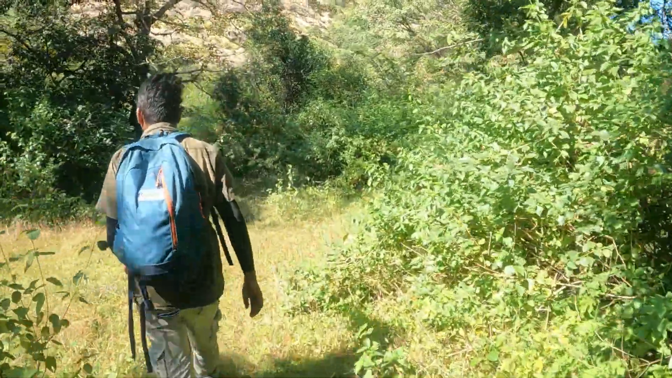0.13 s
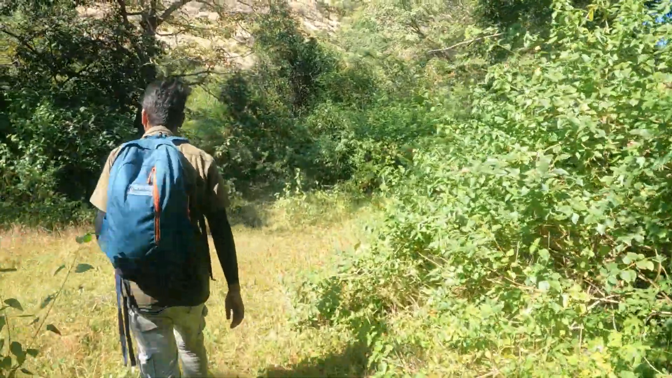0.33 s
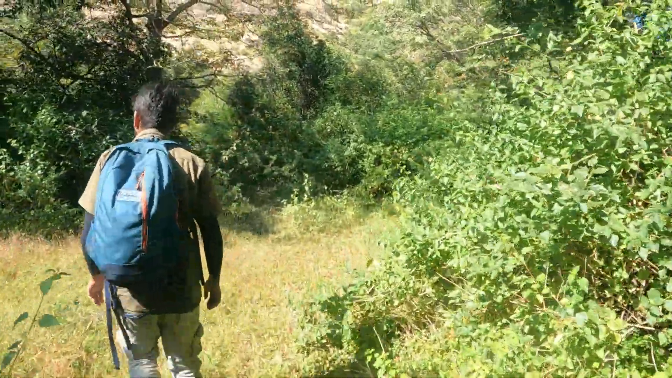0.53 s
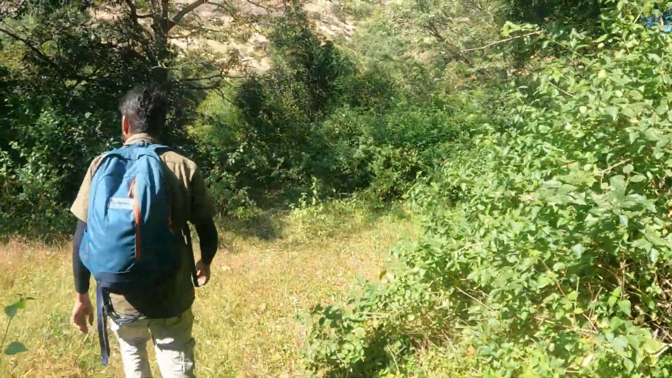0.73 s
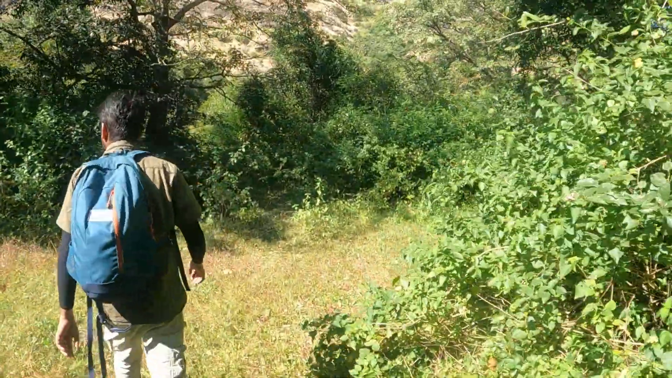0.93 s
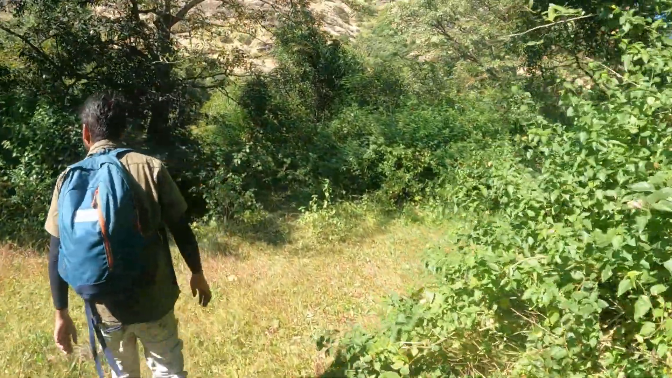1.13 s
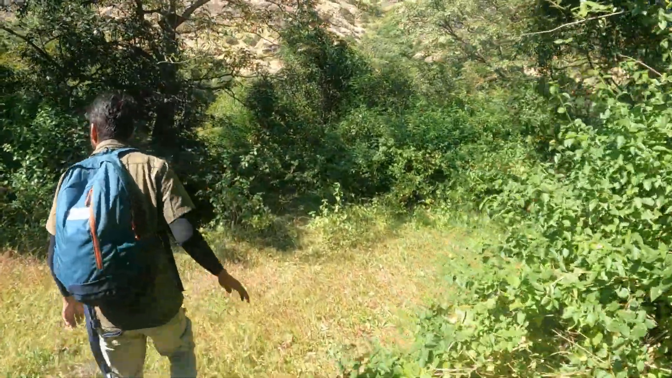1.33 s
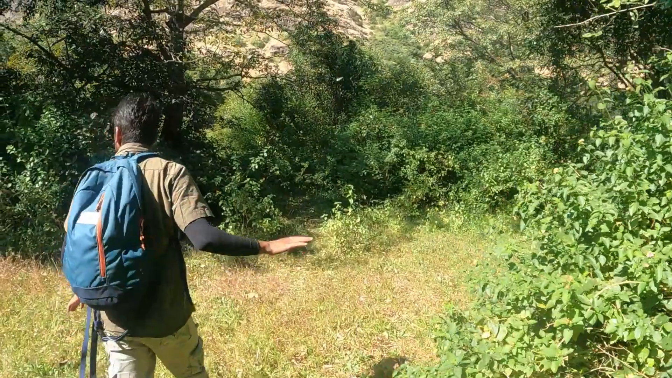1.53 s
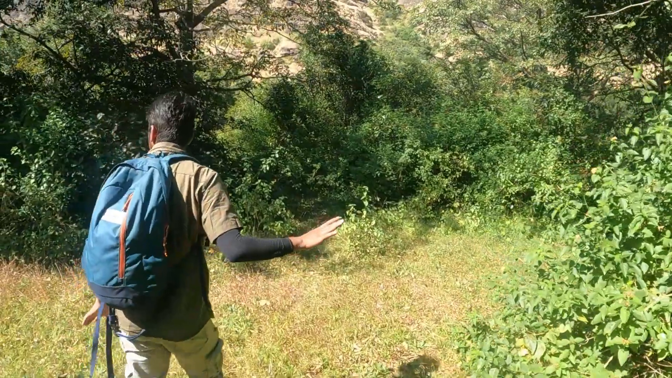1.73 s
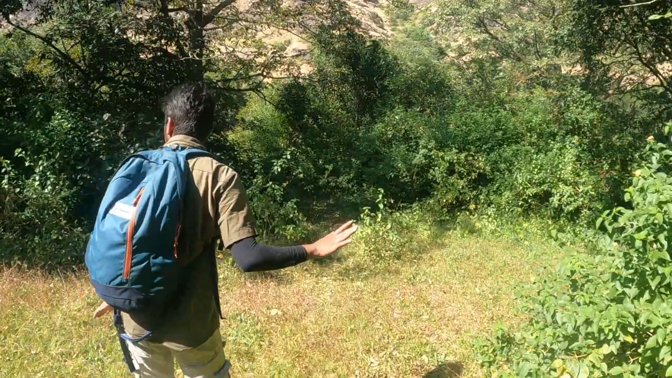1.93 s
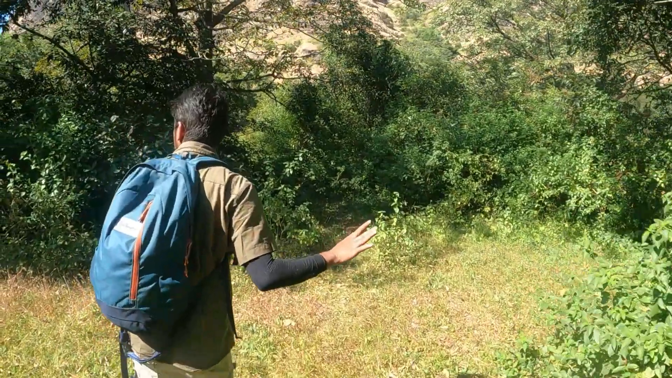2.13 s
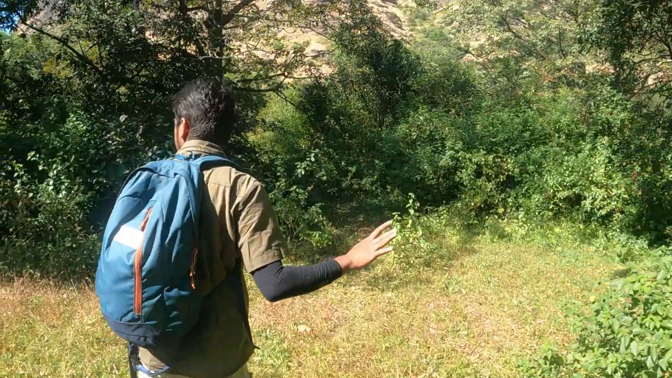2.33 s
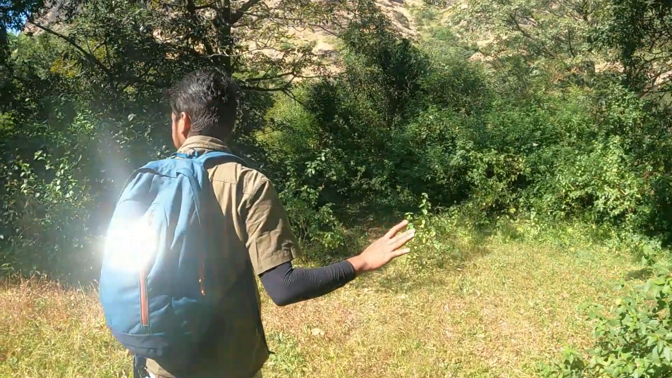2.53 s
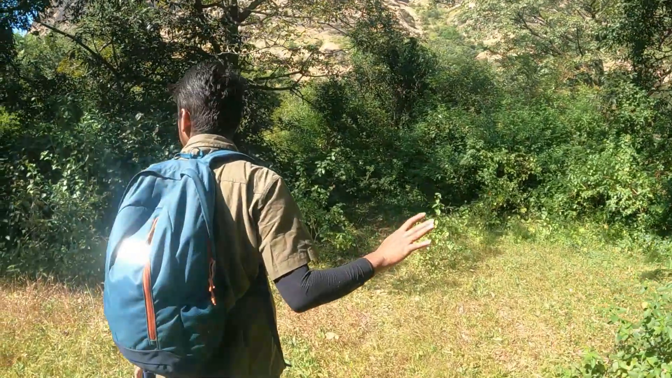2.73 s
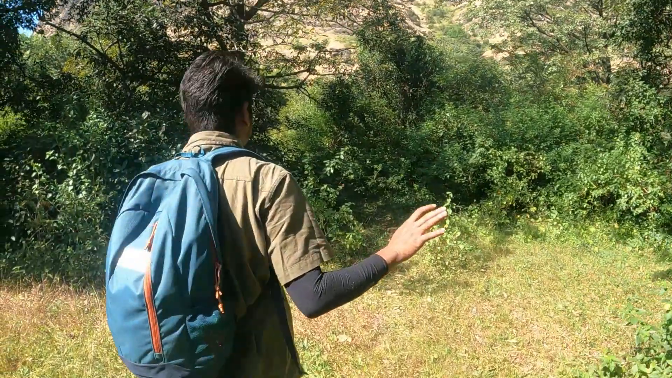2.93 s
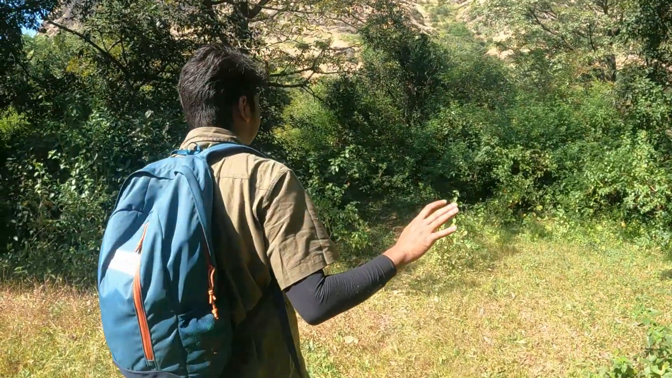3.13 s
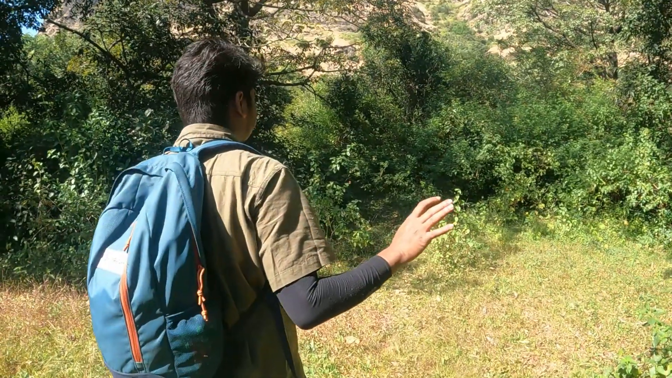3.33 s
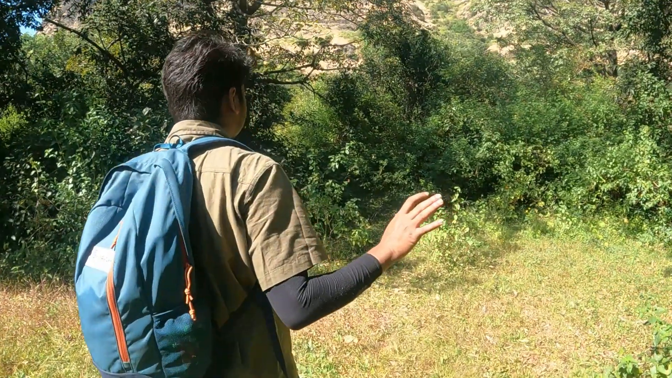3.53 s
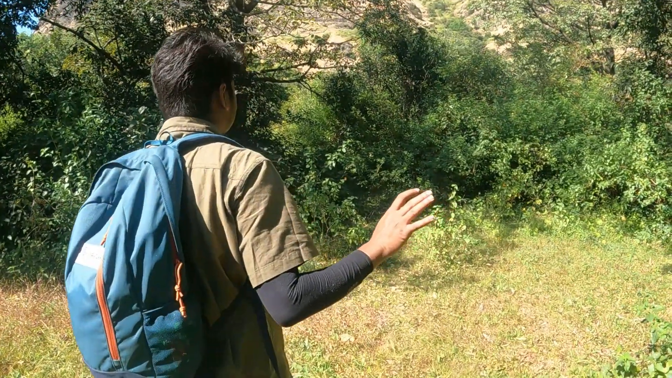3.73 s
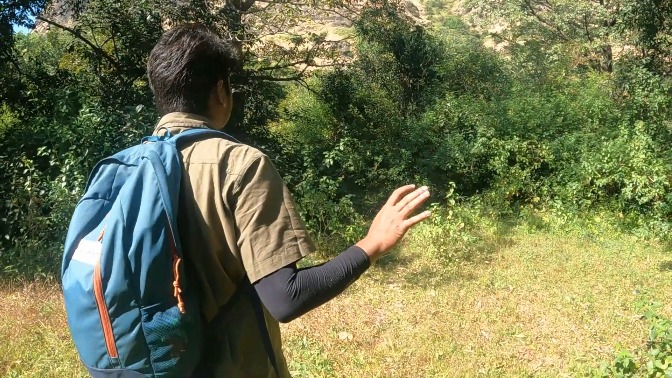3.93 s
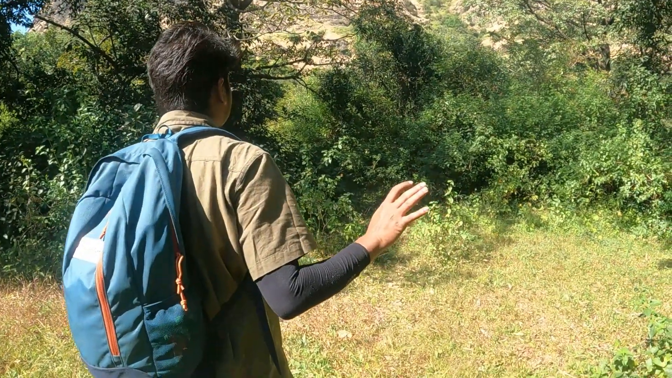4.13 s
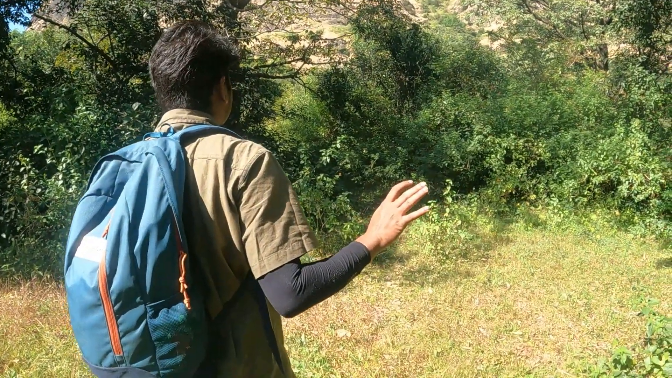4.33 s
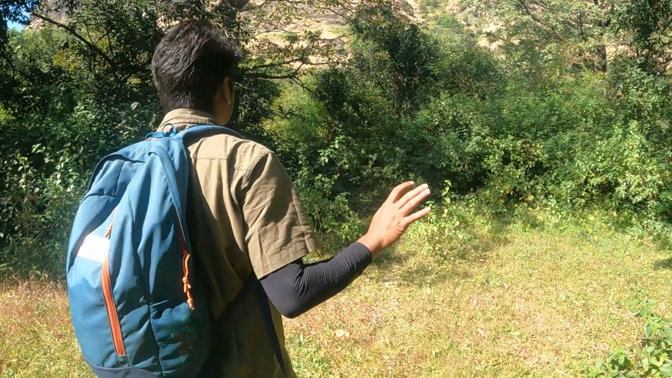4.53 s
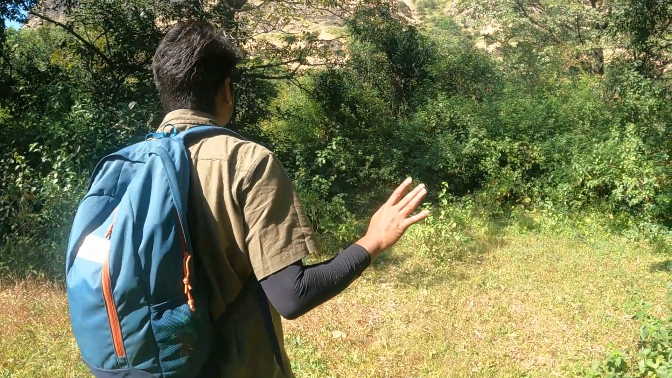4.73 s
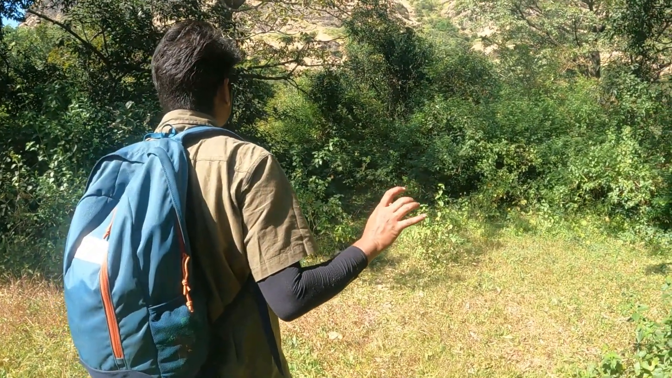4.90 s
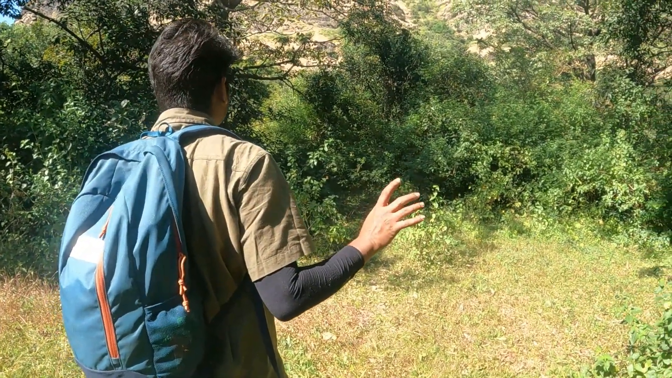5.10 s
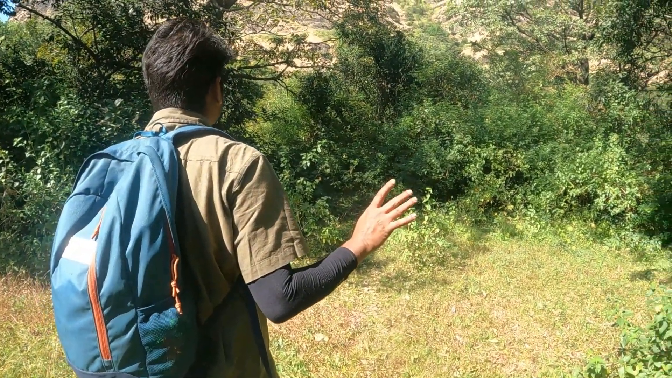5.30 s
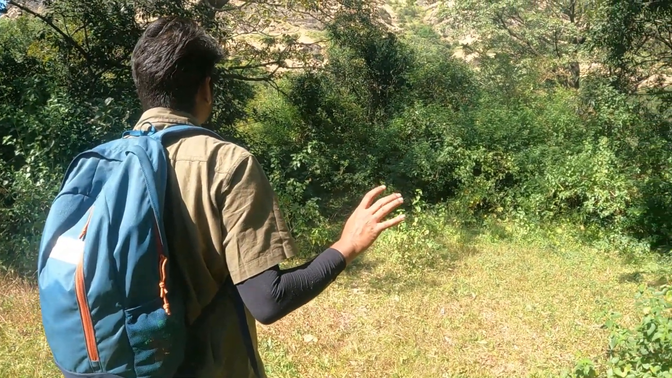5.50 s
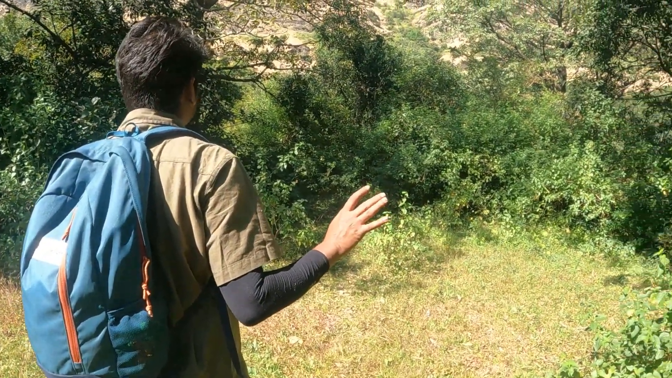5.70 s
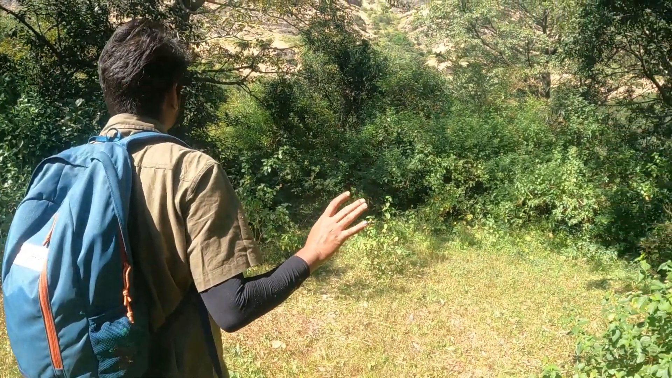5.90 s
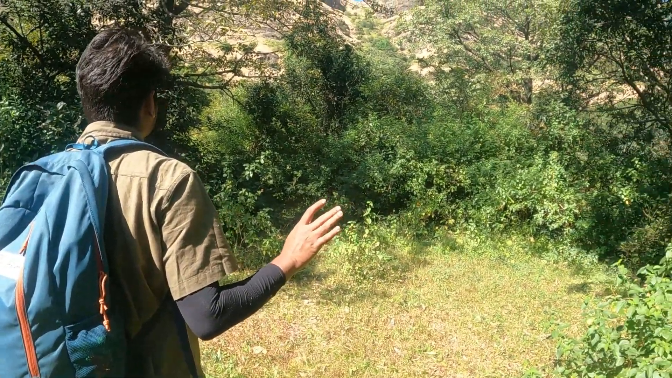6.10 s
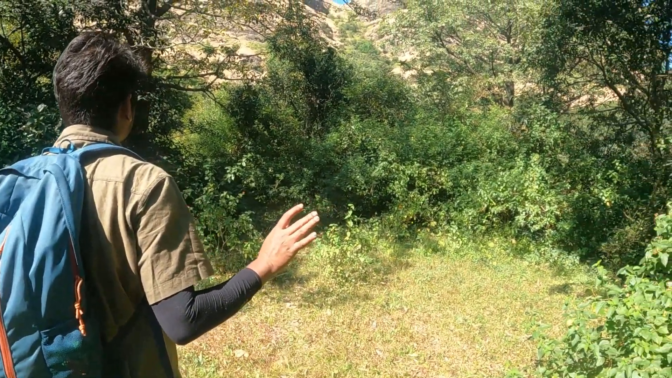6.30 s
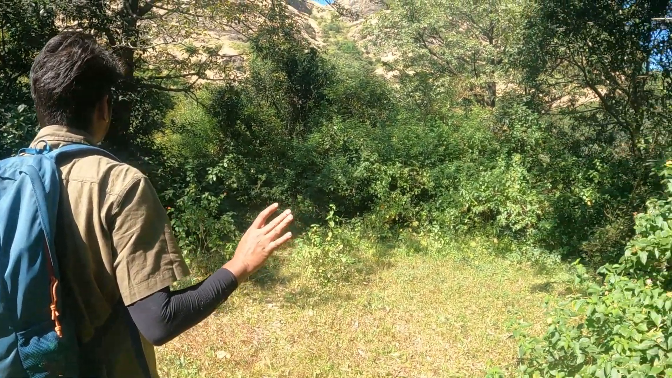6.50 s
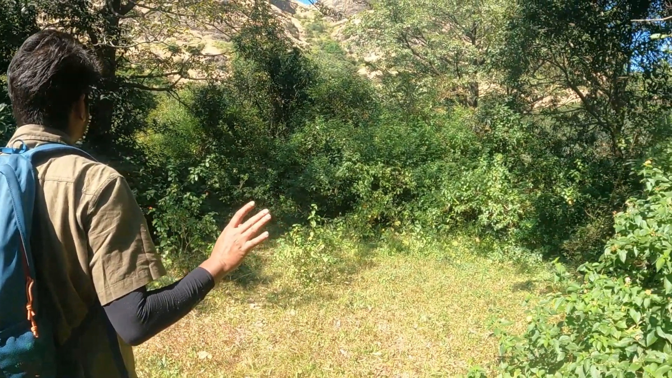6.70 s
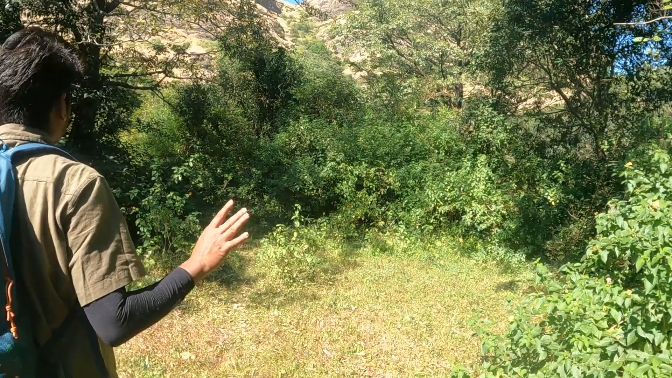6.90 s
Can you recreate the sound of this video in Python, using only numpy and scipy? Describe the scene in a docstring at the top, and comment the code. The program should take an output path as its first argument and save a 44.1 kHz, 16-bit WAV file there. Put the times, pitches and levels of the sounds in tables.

```python
"""Feet crunch through dry grass and leaf litter on a forest trail, then stop; single stems keep snapping.
Blades, leaves and stalks hiss as they rub and crackle as they break; trodden grass ticks as it rises.
Birds whistle short, mostly falling notes that echo off the trunks, over a faint hiss of far leaves.
The hand-held camera rumbles and is bumped now and then."""
import sys
import numpy as np
from scipy import signal
from scipy.fft import rfft, irfft, next_fast_len
from scipy.io import wavfile
from scipy.ndimage import uniform_filter1d, map_coordinates

SR = 44100
rng = np.random.default_rng(int(sys.argv[2]) if len(sys.argv) > 2 else 0)


def generate_wav(signal):
    """Clip the signal to [-1, 1] and save it as 16-bit WAV at the path in sys.argv[1]."""
    frames = np.transpose(np.atleast_2d(signal))
    scaled = np.clip(frames, -1, 1) * 32767
    pcm = np.round(scaled).astype(np.int16)
    wavfile.write(sys.argv[1], SR, pcm)


N = 311005
STOP_S, CRACKLE_S = 2.804, 3  # end of the walk; span of one run of crackle

# Microphone response: bright peak, dull top. Each row: frequency in Hz, gain in dB.
MIC_RESPONSE = [(200, -34), (600, -10.5), (1100, -0.5), (3000, 3), (7300, 5), (9500, -2), (12000, -15),
                (15000, -26.5), (16500, -57)]


def amp(db):
    """Gain of a level in dB."""
    return 10 ** (np.asarray(db) / 20)


def unit(x):
    """x at rms 1."""
    return x / np.sqrt(np.mean(x ** 2) + 1e-20)


def curve(rows):
    """(s, value) rows interpolated to one value per sample."""
    return np.interp(np.arange(N) / SR, *np.transpose(rows))


def wobble(rate_hz):
    """Smooth random curve, rate_hz knots a second."""
    knots = rng.standard_normal(int(N * rate_hz / SR) + 4)
    return map_coordinates(knots, [np.arange(N) * rate_hz / SR])


def coloured(x, points):
    """x filtered by (Hz, dB) points on a log frequency axis."""
    size = next_fast_len(N + 8192)
    hz, db = np.transpose(points)
    gain_db = np.interp(np.log(np.fft.rfftfreq(size, 1 / SR) + 1), np.log(hz + 1), db)
    return irfft(rfft(x, size) * amp(gain_db), size)[..., :N]


def sides(pan_db):
    """Left and right gains; positive is left."""
    return amp(np.array([pan_db, -pan_db]) / 2)


def stereo_noise(alike):
    """White noise with channel correlation alike."""
    a, b = rng.standard_normal((2, N))
    turn = np.arccos(np.clip(alike, 0, 1)) / 2
    mid, side = np.cos(turn) * a, np.sin(turn) * b
    return np.array([mid + side, mid - side])


def patchy(x, depth_db):
    """Random blotches of gain over time and frequency."""
    spectra = signal.stft(x, nperseg=512)[2]
    field = uniform_filter1d(rng.standard_normal(spectra.shape[1:]), size=5, axis=0)
    field = uniform_filter1d(field, size=14, axis=1)
    return signal.istft(spectra * amp(depth_db * unit(field)), nperseg=512)[1][:, :N]


def crackle(count, centre_hz, spread_db, cycles, scatter_db):
    """Tiny breaks at random moments, most small, a few large: damped sines, each with its own pan."""
    onset, damping, size, side = rng.random((count, 4)).T[:, :, None]
    t = np.arange(160) / SR
    hz = np.clip(centre_hz * np.exp(0.39 * rng.standard_normal((count, 1))), 300, 16000)
    grains = np.sin(2 * np.pi * hz * t) * np.exp(-t * hz / (cycles * (0.18 + 2 * damping)))
    grains *= amp(-spread_db * np.log(size + 0.009))
    at = ((onset * CRACKLE_S * SR).astype(int) + np.arange(len(t))).ravel()
    gains = sides(scatter_db * (2 * side - 1))
    return np.array([np.bincount(at, (grains * gain).ravel(), N)[:N] for gain in gains])


def footwork():
    """Litter level and brightness in dB: crunches swell, hold and die over the swish of legs in grass."""
    # A foot presses or drags. Each row: peak time in s, rise in dB/s, hold in s, level in dB,
    # brightness in dB.
    crunches = [(0.0, 300, 0.011, -46, 1), (0.243, 72, .12, -47, 0.5), (0.472, 150, 0.059, -49.5, -1.5),
                (0.562, 500, 0.03, -48.5, 0), (0.746, 145, 0.15, -52.5, -8), (1.018, 74, 0.064, -47.5, 10),
                (1.186, 504, 0.011, -45, 3), (1.247, 139, 0.028, -44, 3), (1.35, 100, 0.074, -46.5, -0.5),
                (1.472, 98, .05, -49.5, -4.5), (1.58, 500, 0.062, -41, 1.5), (1.777, 190, 0.086, -45, 3),
                (1.943, 145, 0.095, -45.5, 2.5), (2.088, 100, 0.026, -54, 7), (2.234, 106, 0.045, -50, 4.5),
                (2.531, 272, 0.056, -47.5, 3.5), (2.737, 199.5, 0.029, -46.5, 2.5)]
    lift_db_per_s, settle_db_per_s, swish_db = 164, 79.5, -58
    t = np.arange(N) / SR
    peak_s, rise_db_per_s, hold_s, db, bright_db = np.transpose(crunches)[:, :, None]
    attack_db = rise_db_per_s * np.maximum(peak_s - t, 0)
    release_db = lift_db_per_s * np.maximum(t - peak_s - hold_s, 0)
    crunch_power = amp(db - attack_db - release_db) ** 2
    swish_power = amp(swish_db - settle_db_per_s * np.maximum(t - STOP_S, 0)) ** 2
    power = crunch_power.sum(axis=0) + swish_power + 1e-30
    return 10 * np.log10(power), (crunch_power * bright_db).sum(axis=0) / power


def litter():
    """Blades, leaves and the stalks below rub (hiss) and break (grains) underfoot; small stems snap."""
    # Spectra. Each row: frequency in Hz, relative density in dB.
    blade_spectrum = [(3240, -24.5), (5500, -4), (7420, 0), (8220, -4.5), (9440, -5), (14400, -22.5),
                      (15200, -40.5), (16000, -56)]
    leaf_spectrum = [(2000, -10.5), (3000, -6.5), (4200, -2), (5500, -4), (7500, -55)]
    stalk_spectrum = [(250, 8), (500, -5), (900, -2), (1100, 4), (2200, 0.5), (3200, -2), (5000, -48)]
    level_db, bright_db = footwork()
    jerk_db = 2.15 * wobble(70)  # pressure comes in jerks

    def layer(db, spectrum, centre_hz, alike, grainy):
        hiss = unit(coloured(stereo_noise(alike), spectrum))
        breaks = coloured(crackle(4000, centre_hz, spread_db=4, cycles=1.45, scatter_db=-2), spectrum)
        breaks /= breaks[:, :CRACKLE_S * SR].std()
        texture = np.sqrt(1 - grainy) * hiss + np.sqrt(grainy) * breaks
        return amp(db + jerk_db + 1.17 * wobble(40.17)) * texture

    blades = layer(level_db + bright_db, blade_spectrum, centre_hz=7300, alike=0.73, grainy=0.5)
    leaves = layer(level_db, leaf_spectrum, centre_hz=4030, alike=0.59, grainy=0.64)
    stalk_db = level_db - 4.5 - 0.22 * bright_db
    stalks = layer(stalk_db, stalk_spectrum, centre_hz=1570, alike=0.57, grainy=0.38)
    stem_breaks = crackle(count=200, centre_hz=6000, spread_db=2, cycles=0.7, scatter_db=0)
    stems = amp(level_db + 7) * coloured(stem_breaks, MIC_RESPONSE)
    return (blades + leaves + stalks + stems) * sides(1.19 + 1.2 * wobble(5.74))


def camera_shake():
    """Hand shake: a rumble, different at each microphone port, and a drone that sinks as the walk ends."""
    # Each row: time in s, rumble level in dB.
    shake_levels = [(0.0, -54.5), (0.39, -50.5), (1.04, -61.5), (1.33, -51), (1.55, -59.5), (2.05, -57),
                    (2.5, -62), (3.69, -64), (5.1, -59.5), (7.05, -62.5)]
    # Spectra. Each row: frequency in Hz, relative density in dB.
    rumble_spectrum = [(10, -11), (22, 0.5), (40, 1.5), (70, -13), (120, -21.5), (200, -53)]
    drone_spectrum = [(70, -23), (115, -11), (145, -0.5), (200, -2.5), (250, -8), (500, -15), (900, -22),
                      (1300, -66.5)]
    shake_db = curve(shake_levels)
    rumble_db = shake_db + 3 * np.array([wobble(29), wobble(3.58)])
    rumble = amp(rumble_db) * unit(coloured(stereo_noise(0.36), rumble_spectrum))
    walking = np.clip(STOP_S - np.arange(N) / SR, 0, 1)  # fades over the walk's last second
    drone_db = -64.5 + 1.5 * walking + 0.65 * (shake_db - shake_db.mean()) + 1.6 * wobble(14)
    drone = amp(drone_db) * unit(coloured(stereo_noise(0.43), drone_spectrum))
    return rumble + drone * sides(-5.5 + 4 * walking)


def forest():
    """Faint wide hiss of far leaves, and birds too far to tell apart, blurred into blotches."""
    # Spectra. Each row: frequency in Hz, relative density in dB.
    high_spectrum = [(2470, -21.5), (4200, -7.5), (5920, -5.5), (7600, -5), (8300, -12), (12000, -29),
                     (14500, -50.5)]
    low_spectrum = [(470, -41), (800, -34), (974, -8), (1460, -9.5), (2600, -12), (3380, -33.5),
                    (5720, -120)]
    chatter_spectrum = [(2000, -28), (2600, -3.5), (3300, -1), (4200, -8), (5200, -48)]
    # Each row: time in s, level in dB.
    chatter_levels = [(2.9, -63), (3.2, -69), (3.8, -89.5), (4.14, -72.5), (4.64, -73), (5.45, -79.5),
                      (6.04, -69), (6.4, -76), (7.05, -69)]

    def bed(db, spectrum, alike, depth_db):
        return amp(db) * unit(coloured(patchy(stereo_noise(alike), depth_db), spectrum))

    high = bed(-71.5, high_spectrum, alike=0.76, depth_db=1.2)
    chatter = bed(curve(chatter_levels), chatter_spectrum, alike=0.39, depth_db=5.5)
    low = bed(-68, low_spectrum, alike=0.23, depth_db=2.5)
    return (high + chatter + low) * sides(1.1)[:, None]


def camera_bumps():
    """Bumps and scuffs on the camera body: a tick, one push and a slow return."""
    # Each row: start in s, level in dB, frequency in Hz, pan in dB.
    bumps = [(0.039, -34.5, 52.6, -10.5), (0.469, -34, 49.3, 5.5), (0.752, -37.5, 168, -1),
             (0.78, -38, 396, 7), (0.827, -39, 583, 6), (1.345, -32, 350, 6), (1.658, -38.5, 51.1, 10),
             (1.734, -40, 416, 6), (1.984, -34.5, 109, 4), (2.029, -41, 32.3, 2), (2.108, -39.5, 35.0, 8),
             (2.128, -37.5, 32.3, 5), (2.31, -39.5, 106, -2), (3.981, -30.5, 38.3, -9),
             (6.449, -30.5, 40.6, -9.5)]
    out = np.zeros((2, N))
    t = np.arange(SR // 20) / SR
    for start_s, db, hz, pan_db in bumps:
        drift = 0.1 * np.cumsum(rng.standard_normal(len(t))) * np.sqrt(hz / SR)  # no clean pitch
        cycles = drift + hz * t + 0.28 * (1 - np.exp(-t / 0.00053))  # starts fast, then slows
        push = -np.sin(2 * np.pi * cycles) * np.exp(-t / 0.0054 - 0.52 * hz * t)
        push *= 1 - np.exp(-t / 0.00059)
        tick = 0.24 * uniform_filter1d(rng.standard_normal(len(t)), size=3) * np.exp(-t / 0.00072)
        i = round(start_s * SR)
        out[:, i:i + len(t)] += amp(db) * sides(pan_db)[:, None] * (push / np.abs(push).max() + tick)
    return out


def stem_snaps():
    """Each stem creaks, then breaks: a crack, a brief high ring, a lower body note, faint splintering."""
    # Each row: break time in s, level in dB, ring in Hz, relative body gain in dB, body in Hz.
    stems = [(0.063, -48, 4960, -8, 2530), (0.4735, -24.5, 4570, -27, 2000), (0.5028, -24, 3440, -11, 2060),
             (0.5602, -20, 7140, -0.5, 1060), (0.5867, -29, 4390, -9, 1580), (0.8673, -25, 3960, -5, 1960),
             (0.9235, -31, 7300, -3.5, 2540), (1.0985, -19, 7350, -21, 2960),
             (1.186, -20.5, 4800, -14, 2480), (1.2019, -14, 3670, -6.5, 2680),
             (1.286, -26, 5760, 11.5, 1250), (1.4368, -17.5, 3600, -31, 1400),
             (1.495, -20.5, 4230, -9.5, 2800), (1.505, -29, 7200, -25, 2770), (1.518, -25, 7100, -26, 2770),
             (1.568, -24, 4770, -22, 2550), (1.581, -17, 4340, -6.5, 1560), (1.624, -11, 3820, -8, 2490),
             (1.643, -19, 4200, -2.5, 1760), (1.734, -14, 9300, -23, 680), (1.801, -23, 7300, 2, 1940),
             (1.8659, -17, 4800, -8, 2920), (1.913, -23.5, 4230, -13, 1180), (2.0176, -21, 4440, -18, 2500),
             (2.2475, -21.5, 6700, -19, 1430), (2.3399, -26, 7000, -28, 2900),
             (2.394, -29, 8400, 1.5, 2380), (2.4952, -27.5, 3400, -20, 1960), (2.5274, -27, 3300, 10, 2970),
             (2.6374, -7, 7500, -17, 3000), (2.6617, -20.5, 7300, -30, 1120),
             (2.6905, -25, 7300, -28, 3020), (2.7122, -21, 7240, -20, 3000), (2.723, -23, 5830, -12, 2670),
             (2.74, -15.5, 7430, -21, 2940), (2.752, -13, 8000, -4, 1042), (2.7845, -23, 6000, -7, 2360),
             (2.825, -21, 3820, -0.5, 1390), (2.8628, -28.5, 7400, -32, 2310),
             (3.0038, -33.5, 6950, 10, 2210), (3.036, -35.5, 4930, -2, 2000), (3.0814, -38, 6900, -9, 1880),
             (3.1103, -31.5, 5860, -2, 1360), (3.2889, -39, 7600, -6, 1230), (4.0629, -20, 6360, 7, 1820),
             (4.1693, -38.5, 7350, -13, 1630), (4.3844, -40, 6900, -22, 1040),
             (4.3963, -24, 9000, -21, 2170), (4.423, -29, 8300, -16, 1410), (4.4251, -31, 8800, -19, 3050),
             (4.441, -48, 6600, 2, 2620), (4.459, -48, 6240, -15, 2620), (4.4842, -37, 5100, -17, 2960),
             (4.533, -46.5, 7500, -21, 2890), (4.6005, -37.5, 8000, -26, 2150),
             (4.6419, -19.5, 8130, -18, 2220), (4.6713, -35, 6070, -6, 2280),
             (4.7417, -27, 7060, -7.5, 2900), (4.861, -45, 6850, -8, 2640), (4.893, -34.5, 8000, -9, 2300),
             (4.9325, -32.5, 5900, 10.5, 1450), (5.002, -42.5, 6950, 1, 2280),
             (5.1134, -41, 8300, -17, 2170), (5.1743, -24.5, 6000, -10, 1940),
             (5.2859, -36.5, 6450, -20, 1470), (5.29, -33, 6100, -17, 1470), (5.3168, -29.5, 4920, 2, 1600),
             (6.0207, -24, 3930, -30, 1810)]
    out = np.zeros((2, N + SR))
    t = np.arange(SR // 12) / SR - 0.006  # zero at the break
    after = np.maximum(t - 0.0006, 0)

    def pulse(rise_s, decay_s):
        return np.exp(-after / decay_s) * (1 - np.exp(-after / rise_s))

    for break_s, db, ring_hz, body_db, body_hz in stems:
        pan_db = 2.5 + 4 * rng.standard_normal()  # the stems lie a little to the left
        noise = rng.standard_normal((3, len(t)))
        creak = 0.063 * noise[0] * np.exp(np.minimum(t, 0) / 0.0021) * (after == 0)
        ring = np.sin(2 * np.pi * ring_hz * after) * pulse(0.000136, 0.00054)
        crack = 0.79 * np.diff(noise[0], prepend=0) * pulse(0.00021, 0.001)
        body = amp(body_db) * np.sin(2 * np.pi * body_hz * after) * pulse(0.00024, 0.00057)
        splinter_gain = 0.06 * np.exp(-after / 0.0024) + 0.019 * np.exp(-after / 0.062)
        splinter = noise[1:] * splinter_gain * (after > 0)
        snap = (ring + crack) / np.abs(ring + crack).max()
        i = round((break_s + t[0]) * SR)
        out[:, i:i + len(t)] += amp(db) * sides(pan_db)[:, None] * (creak + snap + body + splinter)
    return out[:, :N]


def among_trees(start_s, call, direct):
    """A call placed at start_s, with the fuzzy tail that the trunks return."""
    rt60_s, build_s = 0.53, 0.0053
    t = np.arange(SR // 2) / SR
    echoes = rng.standard_normal((2, len(t))) * amp(-60 * t / rt60_s) * (1 - np.exp(-t / build_s))
    heard = signal.fftconvolve(call[None], echoes / np.linalg.norm(echoes[0]), axes=1)
    heard[:, :len(call)] += direct * call
    return np.pad(heard, ((0, 0), (round(start_s * SR), N)))[:, :N]


def bird_whistles():
    """Whistled glides, quick at first, then settling; slightly unsteady."""
    # Each row: start in s, length in s, first and last pitch in Hz, level in dB, pan in dB.
    notes = [(0.39, 0.087, 2100, 2055, -49.5, 11), (0.652, 0.073, 3500, 3150, -44, 1),
             (0.767, 0.074, 4000, 3840, -48.5, -1), (2.49, 0.044, 1890, 2000, -50, 2),
             (2.474, 0.08, 3000, 3500, -47.5, 12), (2.78, 0.09, 3720, 3740, -47, 4),
             (3.419, 0.088, 3500, 3475, -62, 2), (3.487, 0.068, 3800, 3850, -61, 0),
             (3.823, 0.11, 2010, 2017, -66, 3), (3.893, 0.047, 3120, 3270, -62.5, 9.5),
             (4.089, 0.03, 2570, 2217, -57.5, 2), (4.118, 0.031, 2200, 1886, -55, 2),
             (4.161, 0.049, 1910, 1626, -59, 5), (4.28, 0.03, 3240, 2870, -59, -1),
             (4.696, 0.069, 3050, 3010, -62, 3), (4.85, 0.076, 2725, 2540, -66.5, -23),
             (4.983, 0.041, 2960, 2290, -52.5, 3), (5.039, 0.037, 2420, 2145, -51, 1),
             (5.66, 0.056, 1840, 1700, -62, -1), (5.781, 0.02, 2290, 2750, -57, 0.5),
             (5.844, 0.036, 2820, 3240, -48, 3), (5.901, 0.051, 4260, 3665, -41.5, 0.5),
             (6.112, 0.044, 2930, 2250, -40.5, 1.5), (6.175, 0.032, 3590, 3300, -45.5, -1.5),
             (6.955, 0.034, 3260, 3180, -65, 8)]
    out = np.zeros((2, N))
    for start_s, length_s, first_hz, last_hz, db, pan_db in notes:
        progress = np.arange(int(length_s * SR)) / (length_s * SR)
        glide_hz = last_hz + (first_hz - last_hz) * (1 - progress) ** 3.2
        waver = np.interp(progress, np.linspace(0, 1, 24), rng.standard_normal(24))
        depth = 0.02 + 0.033 * abs(first_hz / last_hz - 1)  # wide glides are rougher
        hz = glide_hz * (1 + depth * waver)
        swell = progress ** 0.59 * (1 - progress)
        note = np.sin(2 * np.pi * np.cumsum(hz) / SR) * swell / swell.max()
        nearness = np.clip((db + 77.5) / 45, 0.1, 1)  # a louder bird is nearer, so clearer
        out += amp(db) * sides(pan_db)[:, None] * among_trees(start_s, note, direct=nearness)
    return out


def bird_chips():
    """Raspy calls: short bursts of narrow noise."""
    # Each row: start in s, length in s, centre in Hz, bandwidth in Hz, level in dB.
    chips = [(2.551, 0.036, 2720, 900, -44.5), (3.447, 0.033, 5600, 1430, -63.5),
             (3.612, 0.032, 7760, 2000, -69.5), (4.075, 0.061, 6800, 1300, -64.5),
             (5.549, 0.037, 5300, 2450, -63), (5.823, 0.015, 2660, 2000, -60)]
    out = np.zeros((2, N))
    for start_s, length_s, hz, width_hz, db in chips:
        t = np.arange(int(length_s * SR)) / SR
        band = signal.butter(2, [hz - width_hz / 2, hz + width_hz / 2], "band", fs=SR)
        rasp = unit(signal.lfilter(*band, rng.standard_normal(len(t))))
        gate = np.sin(np.pi * t / length_s) ** 0.1
        out += amp(db) * among_trees(start_s, rasp * gate, direct=1)
    return out


def trodden_grass():
    """After the walk, trodden grass rises with faint ticks while weight shifts on it."""
    # Each row: time in s, gain in dB.
    tick_gains = [(2.9, -59), (3.3, -70), (4.2, -68), (4.4, -56.5), (5.3, -57.5), (5.5, -82.5)]
    start_s = 2.9
    ticks = crackle(count=220, centre_hz=7500, spread_db=5.5, cycles=0.35, scatter_db=-10)
    ticks = np.roll(ticks, round(start_s * SR), axis=1)
    return amp(curve(tick_gains)) * sides(4.5)[:, None] * coloured(ticks, MIC_RESPONSE)


def scene():
    """Stereo sum of all sources."""
    underfoot = litter() + coloured(stem_snaps(), MIC_RESPONSE) + trodden_grass()
    return underfoot + forest() + camera_shake() + camera_bumps() + bird_whistles() + bird_chips()


def record(dry):
    """The right port is shaded in the top octave; the camera cuts everything above its band limit."""
    # Each row: frequency in Hz, gain in dB.
    right_shading = [(9000, -1), (11000, -7), (13000, -4.5)]
    top_hz = 16400
    ports = np.array([dry[0], coloured(dry[1], right_shading)])
    return coloured(ports, [(top_hz, 0), (top_hz + 60, -120)])


dry = scene()
out = record(dry)
generate_wav(out)
```